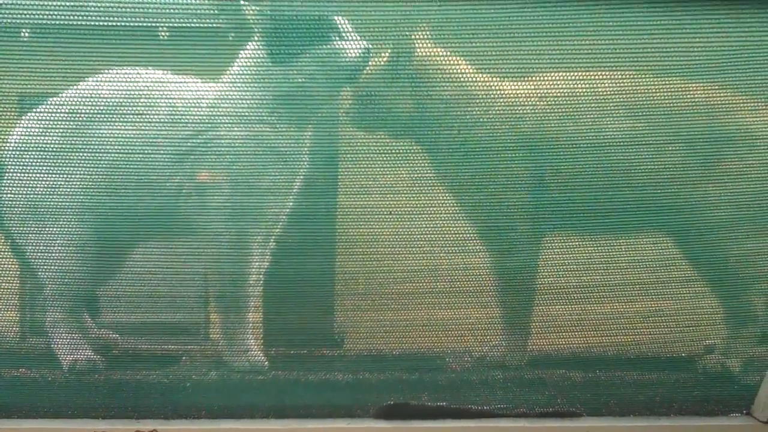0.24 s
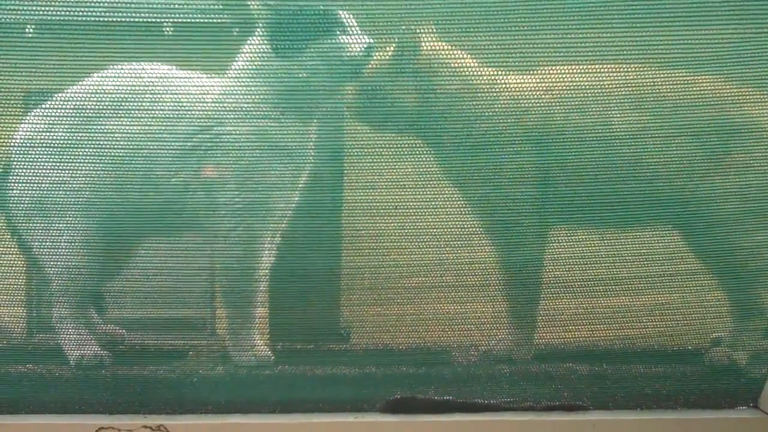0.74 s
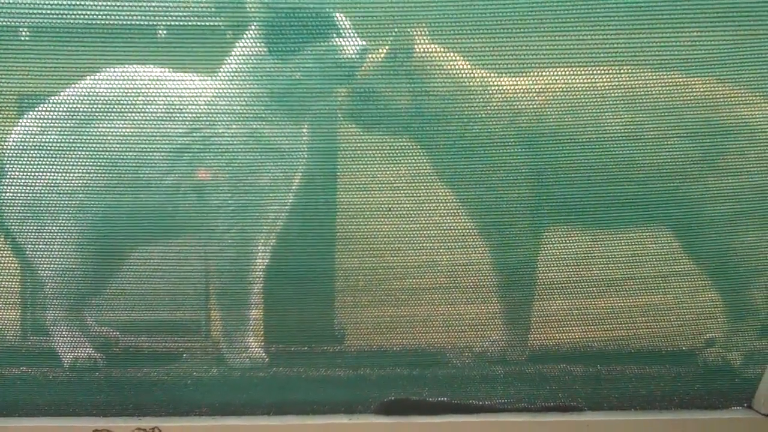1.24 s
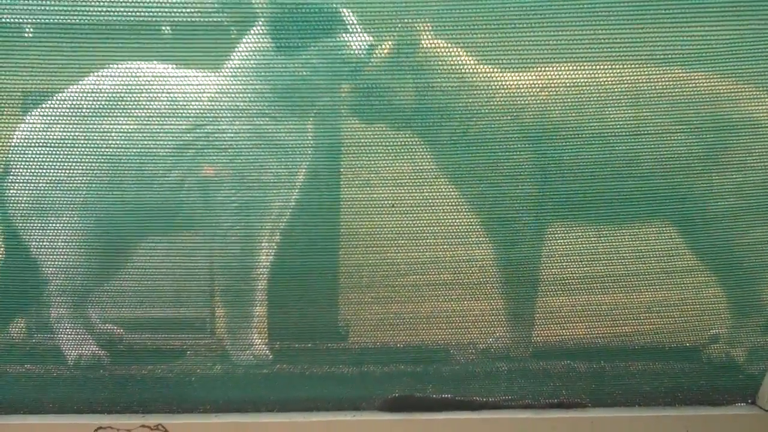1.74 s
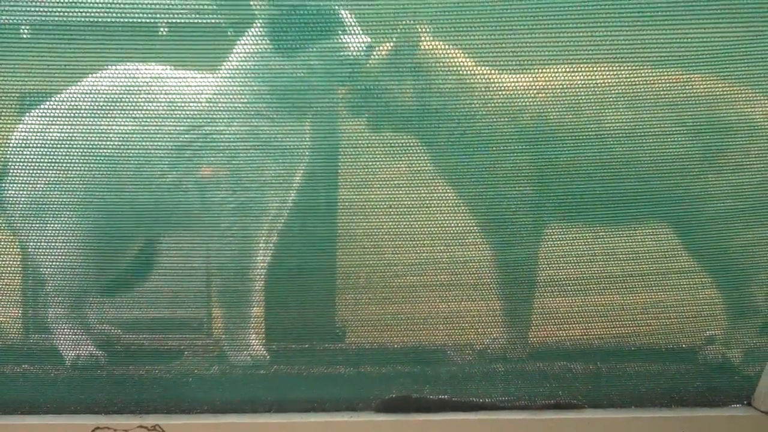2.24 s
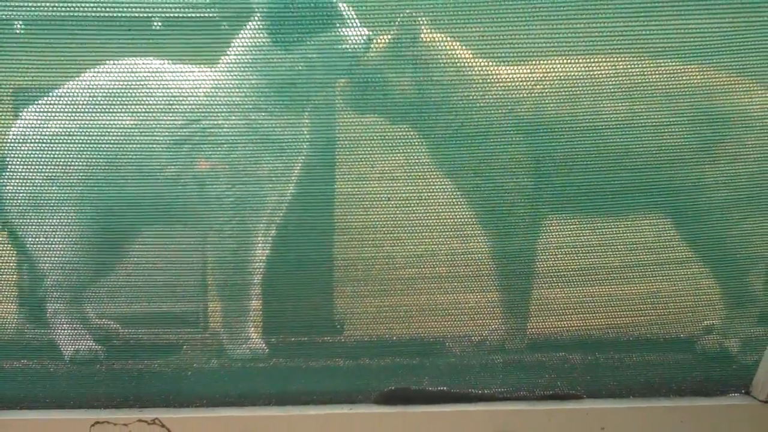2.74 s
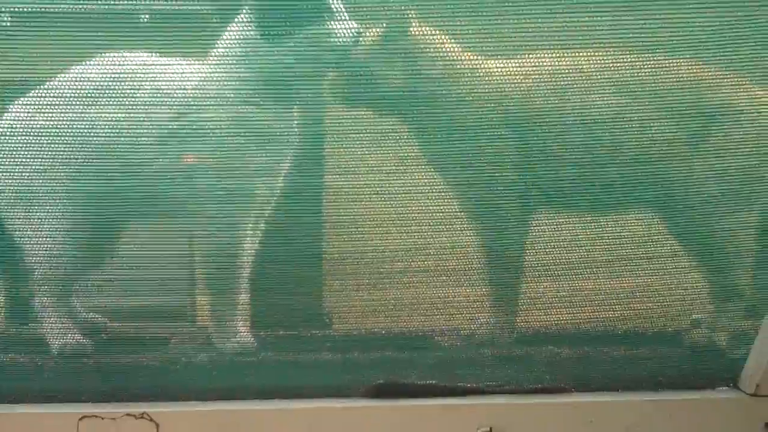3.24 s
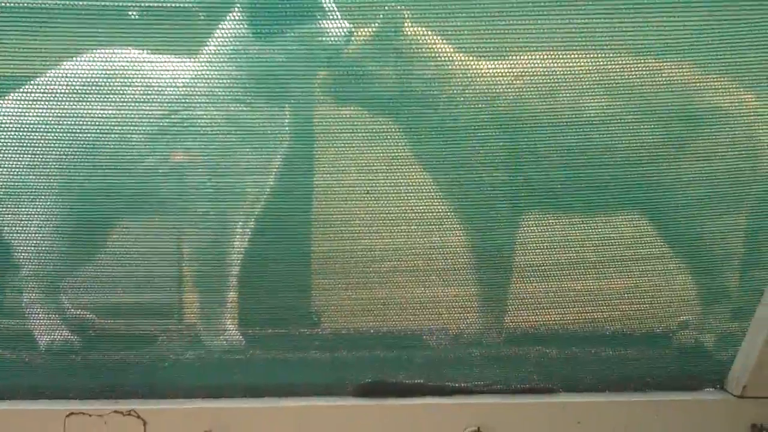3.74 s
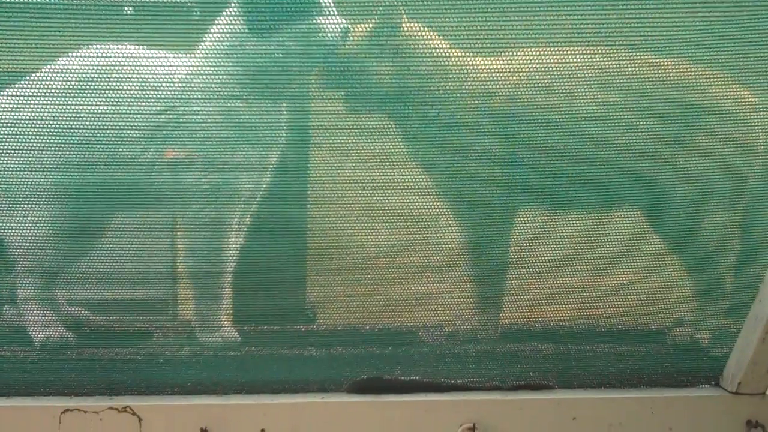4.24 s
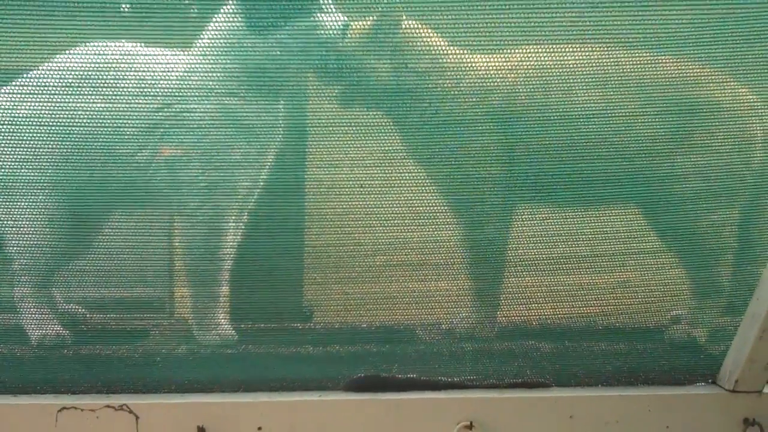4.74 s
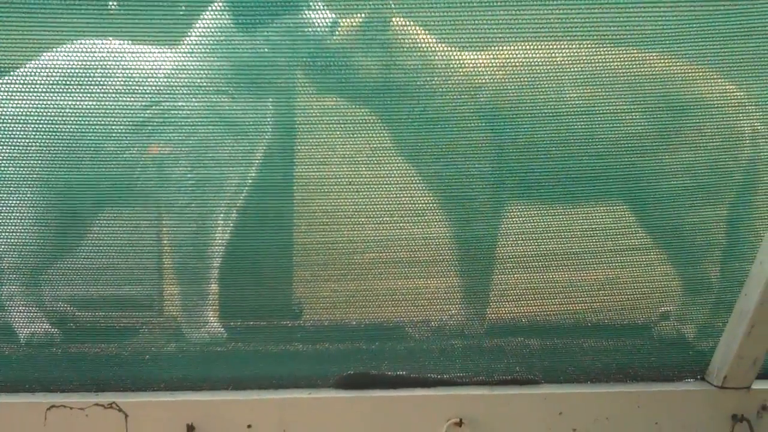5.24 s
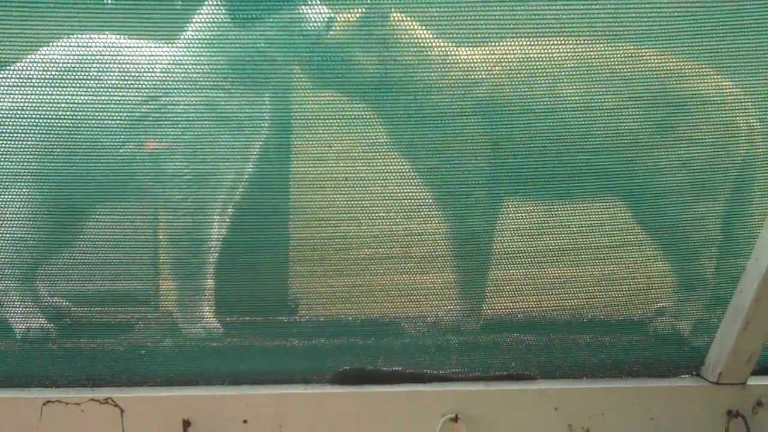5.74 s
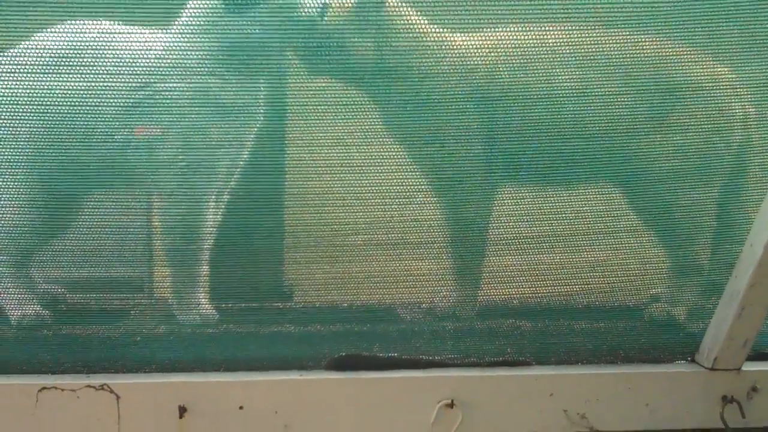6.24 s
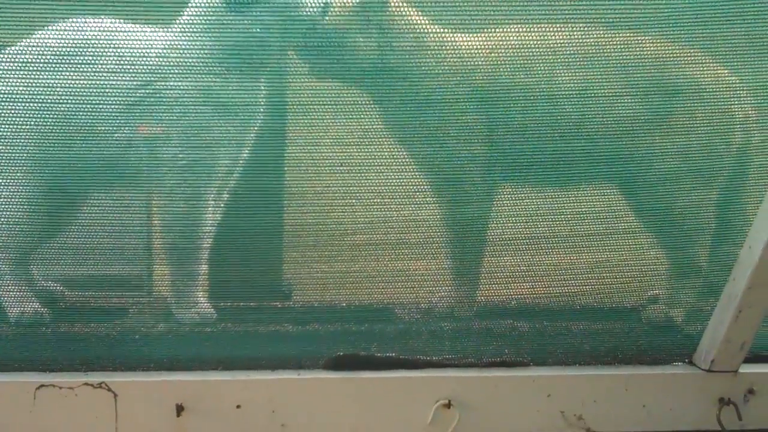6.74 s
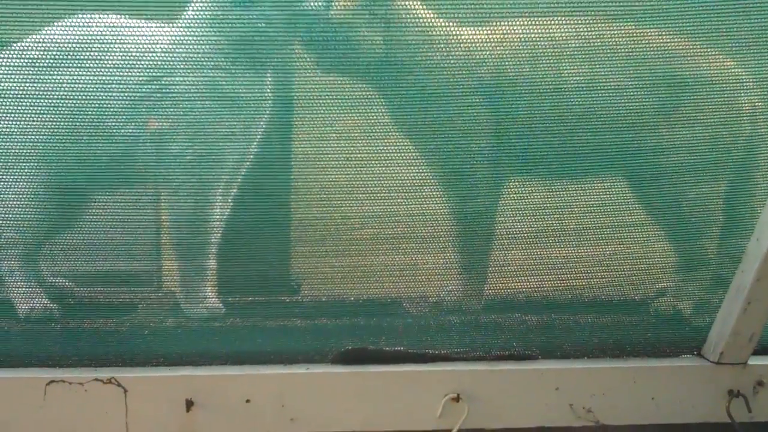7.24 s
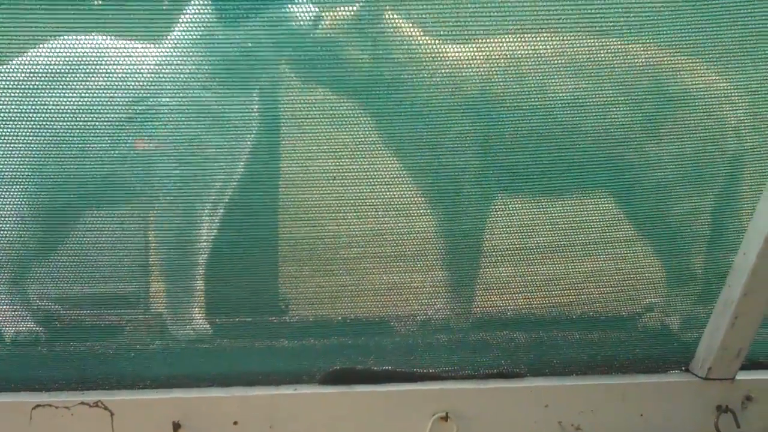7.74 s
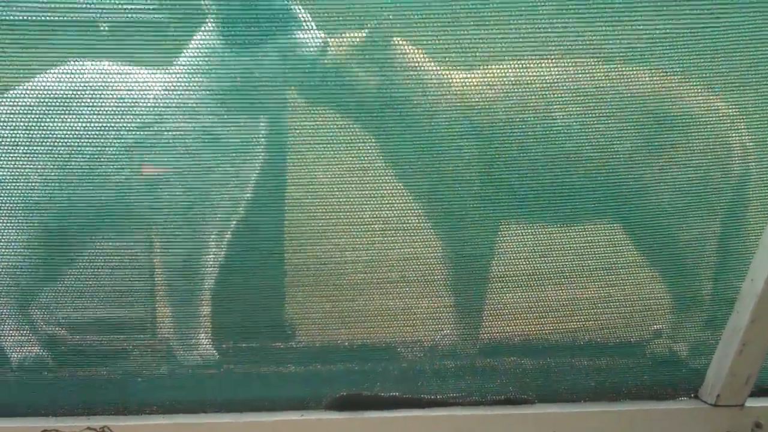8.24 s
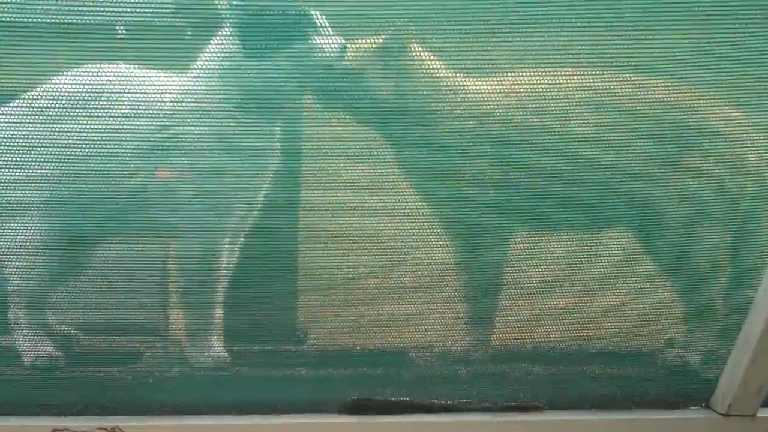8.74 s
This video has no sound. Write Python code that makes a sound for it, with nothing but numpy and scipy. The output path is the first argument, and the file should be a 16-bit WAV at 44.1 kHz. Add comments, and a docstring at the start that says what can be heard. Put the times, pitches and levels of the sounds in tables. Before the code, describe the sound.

Quiet outdoor air with far traffic, a faint high bird whistle and a tick. A cat starts yowling, then a second joins with one long wavering call lasting about six seconds, while the first answers midway. Voices overlap and beat, swell loudest near the middle, then sink and rise once more before stopping. Hush and small handling clicks follow. Handheld microphone close by, mono, slight wall reflections.

```python
"""First comes a quiet outdoor hush with far traffic, a thin bird whistle and a tick of the hand-held camera.
Then two cats on a ledge outside a screened window yowl in long, gliding, overlapping calls.
One holds a single long yowl; the other calls twice. Each voice is a stack of harmonics gliding through
mouth resonances, with rasping air at its edges. Delayed copies and a short noise tail give the nearby walls.
Clicks, rubs and knocks are bursts of coloured noise; the hush, traffic and drone are steadier noise."""
import sys
import numpy as np
from scipy import signal
from scipy.fft import rfft, irfft, next_fast_len
from scipy.io import wavfile
from scipy.ndimage import uniform_filter1d

SR = 44100
rng = np.random.default_rng(int(sys.argv[2]) if len(sys.argv) > 2 else 0)


def wav_out(sig):
    """Save sig, one row per channel (or a flat mono array), as 16-bit PCM at SR to the path in sys.argv[1]."""
    wavfile.write(sys.argv[1], SR, np.round(np.clip(np.atleast_2d(sig).T, -1, 1) * 32767).astype(np.int16))


N = 396018

# Yowl gestures: t/s, pitch f/Hz, effort level/dB before resonance, mouth opening/0-1, brightness/dB per octave
OPENING_YOWL = [(.65, 689, -106, 0.32, -9), (.72, 677, -95.5, 0.22, -3), (.76, 614, -91, .5, -10.5),
                (.9, 512, -91, 0.32, 2.5), (.95, 546, -93, 0.35, 2.5), (1.0, 549.4, -85.5, 0.62, -1),
                (1.22, 563.2, -84.5, 0.67, 0.5), (1.29, 535.4, -85, 0.55, 0), (1.34, 536, -95.5, 0.16, 5.5),
                (1.6, 498, -105, 0.04, -5.5), (1.76, 490, -90, 0.1, 3), (2.05, 513.6, -85.5, 0.53, 0.8),
                (2.28, 580.4, -79, 0.75, 3), (2.44, 588.3, -84.5, 0.75, 3), (2.58, 554, -80.5, 0.75, -1.5),
                (2.76, 491, -94.5, 0, 5.5), (2.9, 435, -101.5, 0, -8)]
LONG_YOWL = [(1.41, 311, -104.8, 0.038, -0.25), (1.53, 348.0, -92.5, 0.049, -1.1),
             (1.6, 432.6, -84, 0.093, -0.83), (1.72, 548.5, -92, 0.27, -1.6),
             (2.0, 591.2, -88.5, 0.35, -0.1), (2.17, 565, -83, 0.4, -0.051),
             (2.27, 582.6, -80.5, 0.44, -0.099), (2.52, 613.4, -77, 0.68, 0.36),
             (3.05, 596, -83.5, 0.39, 1.05), (3.45, 578.9, -82.5, 0.36, -0.25),
             (3.9, 562.9, -83, 0.36, -0.8), (4.28, 541.8, -81, 0.83, 1.45), (4.4, 520.9, -76.5, 0.68, 0.76),
             (4.55, 564.7, -74, 0.92, -0.15), (4.7, 575.2, -73.5, 0.98, -0.89), (4.92, 575.8, -81, 1, 0.0),
             (5.04, 565.2, -76.5, 0.81, 0.73), (5.17, 535, -88.5, 0.55, 1.5),
             (5.42, 468.2, -85, 0.21, 0.43), (5.67, 418.8, -86.5, 0.093, 0.3), (5.9, 402, -87, 0.2, 0.89),
             (6.02, 367.5, -87.5, 0.13, -2.6), (6.55, 378.6, -85.5, 0.14, 0.21),
             (6.72, 420.7, -82, 0.42, -0.62), (6.9, 472.4, -75.5, 0.82, -1.1),
             (7.08, 467.4, -76, 0.58, 0.14), (7.3, 501, -82, 0.71, 1.2), (7.48, 462.9, -74, 0.57, -0.4),
             (7.63, 405.5, -94.5, 0.24, -0.2), (7.71, 340.5, -107.8, 0.26, -0.21)]
ANSWERING_YOWL = [(4.16, 565.2, -112.1, 0.9, -0.1), (4.31, 619, -85.5, 0.98, 0.4),
                  (4.58, 610.3, -84.5, 0.99, 0.3), (4.85, 573.7, -79, 0.79, -0.0),
                  (5.05, 568.4, -87, 0.54, -0.1), (5.18, 589.7, -77.5, 0.6, 0.65),
                  (5.37, 580.4, -82, 0.48, 0.31), (5.6, 538.8, -87.5, 0.33, -0.2),
                  (5.87, 481.8, -96.5, 0.18, 0.019), (6.12, 455.1, -88, 0.13, -0.99),
                  (6.45, 436.5, -92.3, 0.081, -0.23), (6.68, 362.2, -100.1, 0.2, 0.024)]
# Mouth resonances of each cat: closed f/Hz, open f/Hz, half width/Hz, closed level/dB, open level/dB
LONG_FORMANTS = [(659, 1270, 247.5, 34, 34.5), (1530, 1980, 280, 1, 24.5), (2287, 2477, 136, 17.5, 37.5),
                 (3523, 4993, 175, 15.5, 4), (5470, 4700, 160, -14, -5), (6770, 8240, 350, -12.5, -7)]
OTHER_FORMANTS = [(655, 1416, 220, 41.5, 29), (1400, 1825, 230, -13.5, 38), (1988, 2315, 267, 20, 29),
                  (3510, 5280, 273, 9, 11.5), (5490, 7140, 170, -2, 1.5)]
# Throat buzz between the resonances: f/Hz, level/dB
THROAT_BUZZ = [(300, -9), (600, 4), (1000, 19.5), (1150, 21.5), (1400, 16), (1800, 15.5), (2600, 2),
               (4400, -7.5), (5500, -16.5), (7000, -13.5), (9500, -21.5), (13000, -15)]
# Brief swells of the lowest resonance, a loud "wow": t/s, half length/s, level/dB
WOW_SWELLS = [(2.052, 0.023, 12), (4.431, 0.33, 6), (5.008, 0.078, 13), (5.889, 0.094, 8.911),
              (6.613, 0.072, 2), (7.164, 0.027, 11)]
# Brief swells of the second resonance, a harsher squall: t/s, half length/s, level/dB
SQUALL_SWELLS = [(1.58, 0.056, 23.5), (6.93, 0.054, 4.5), (7.46, .04, 5.5)]
# Colour of the rasping breath: f/Hz, relative level/dB
RASP_COLOUR = [(500, -23), (1100, -6), (1750, 5), (2200, -9), (2900, -20.5), (3900, -10.5), (5200, -15.5),
               (6500, -32), (12000, -39)]
# Reflections off ledge, window frame and walls at three camera positions: delay/ms, level/dB
FIRST_ECHOES = [(2.94, -10), (5.57, -12.0), (6.57, -16.5), (7.09, -15.5), (11.67, -16), (16.08, -18.5)]
MIDDLE_ECHOES = [(1.03, -15), (2.99, -14.5), (8.63, -19), (10.76, -16.5), (12.09, -16), (13.5, -12.5)]
LAST_ECHOES = [(6.4, -16), (7.12, -14.0), (9.0, -10.5), (10.0, -12.0), (13.5, -13), (14.31, -14.5)]
# The camera shifts twice: t/s, position/0-2
CAMERA_PATH = [(3.7, 0), (4.1, 1), (5.4, 1), (5.8, 2)]
# Decay of the walls' tail: f/Hz, time to fall 60 dB/s
YARD_DECAY = [(200, 0.034), (1500, 0.63), (5000, 0.64), (12000, 0.011)]
# Camera clicks: t/s, level/dB before trim
CLICKS = [(0.5826, -60.5), (1.8267, -61), (2.934, -48), (3.6845, -59), (4.0133, -57), (4.044, -50),
          (4.4503, -52.5), (4.4867, -52), (5.7982, -54), (5.8561, -57.5), (6.0112, -58), (7.9758, -63),
          (8.3155, -47), (8.3965, -61), (8.4855, -49)]
# Fingers rubbing on the camera body: t/s, length/s, level/dB before the rub's envelope
RUBS = [(8.325, 0.0074, -67), (8.338, .034, -58.5)]
# Colour of the camera case, for clicks and rubs: f/Hz, relative level/dB
CASE_COLOUR = [(100, -13), (900, 6.5), (2000, 0), (3500, 1.5), (6500, 0), (10000, -6.5), (14000, -6)]
# Soft handling knocks: t/s, level/dB before trim
KNOCKS = [(2.933, -50), (4.043, -52.5), (5.185, -59), (8.036, -53.5)]
# Colour of the knocks: f/Hz, relative level/dB
THUD_COLOUR = [(100, -24), (500, 9.5), (900, 7.5), (2000, -11), (6000, -19.5)]
# The far bird's thin whistle: t/s, f/Hz, rms level/dB
WHISTLE = [(.3, 4180, -105), (.33, 4150, -82), (.41, 4120, -83), (.45, 4100, -105)]
# Colour of the outdoor hush: f/Hz, relative level/dB
HUSH_COLOUR = [(12, -38.5), (20, 16), (27, -3.5), (50, -9.5), (195, -13.5), (242, -14), (408, -14.5),
               (980, -11), (1160, -13), (1950, -17.5), (2290, -18.5), (3190, -21.5), (14000, -35.5)]
# Loudness of the hush before its slow waver: t/s, rms level/dB
HUSH_LEVEL = [(0, -67), (3, -67), (7.8, -66), (9, -65)]
# Colour of the far traffic: f/Hz, relative level/dB
ROAD_COLOUR = [(300, -19), (700, -8), (1000, 3.5), (1400, -23), (3000, -26.5)]
# Loudness of the traffic before its slow waver: t/s, rms level/dB
ROAD_LEVEL = [(0, -68.5), (.6, -70), (2, -81.5), (9, -88.5)]

RASP_AT_S, RASP_LASTS_S = 0.12, 0.11  # rasp peaks this far from either end of a call, about this wide
FADE_S, LOOSE_S = 0.035, 0.19  # fade at each end of a call; reach of the slack folds from each end
LOW_HZ, TOP_HZ = 22, 14000  # the low end is halved at LOW_HZ; nothing passes from TOP_HZ up


def cats():
    """The voices beat against each other where their pitches cross."""
    holder = yowl(LONG_YOWL, LONG_FORMANTS,
                  jitter=0.0011, slack=0.016, flutter_db=2.95, drift_db=0.48, rasp_db=-70)
    opening = yowl(OPENING_YOWL, OTHER_FORMANTS,
                   jitter=0.0018, slack=0.014, flutter_db=3.0, drift_db=0.04, rasp_db=-76.5)
    answer = yowl(ANSWERING_YOWL, OTHER_FORMANTS,
                  jitter=0.0027, slack=0.00392, flutter_db=3.0, drift_db=0.73, rasp_db=-79.5)
    return reflected(holder + opening + answer)


def yowl(rows, formants, jitter, slack, flutter_db, drift_db, rasp_db, count=26):
    """Vocal folds give a harmonic stack whose partials swell as they glide through the mouth's resonances."""
    start, end = round(rows[0][0] * SR), round(rows[-1][0] * SR)
    t = np.arange(start, end) / SR
    hz, effort_db, opening, tilt_db = curves(rows, t)
    peaks = swollen([resonance(row, opening) for row in formants], t)

    # the folds are slack and unsteady as a call starts and dies
    edge = np.minimum(t - t[0], t[-1] - t)
    loose = np.exp(-(edge / LOOSE_S) ** 2)
    unsteady = wobble(28, t) + 0.798 * wobble(130, t)
    hz = uniform_filter1d(hz, size=2000) * (1 + (jitter + slack * loose) * unsteady)
    # uneven cycles make the slack voice hoarse
    scatter = 8 * slack * loose * wobble(260, t)
    phase = 2 * np.pi * np.cumsum(hz) / SR + scatter

    voice = np.zeros(len(t))
    for k in range(1, count + 1):
        partial_hz = k * hz
        colour = amp(along(THROAT_BUZZ, partial_hz))
        for centre, width, gain in peaks:
            colour += gain / (1 + ((partial_hz - centre) / width) ** 2) ** 2
        bright_db = tilt_db * np.log2(partial_hz / 1000)  # tilts about 1 kHz
        shudder = 1 + 0.7 * loose * np.tanh(wobble(80, t))
        flutter = flutter_db * np.tanh(wobble(35, t))
        drift = drift_db * np.log2(k + 1) * wobble(12, t)  # wider for higher partials
        level = amp(effort_db + bright_db + flutter + drift)
        voice += np.sqrt(2) * colour * shudder * level * np.sin(k * phase)

    # slack folds leak a puff of rasping air in each cycle
    leak = np.exp(-((edge - RASP_AT_S) / RASP_LASTS_S) ** 2)
    puffs = 1 + np.cos(phase)
    rasp = amp(rasp_db + 4.5 * wobble(40, t)) * leak * puffs * noise(RASP_COLOUR)[start:end]
    fade = np.minimum(edge / FADE_S, 1)
    return np.pad((voice + rasp) * fade, (start, N - end))


def resonance(row, opening):
    """Centre, half width and gain of a mouth resonance, which shifts as the jaw drops."""
    closed_hz, open_hz, width, closed_db, open_db = row
    centre = closed_hz + opening * (open_hz - closed_hz)
    return centre, width, amp(closed_db + opening * (open_db - closed_db))


def swollen(peaks, t):
    """The two lowest resonances surge briefly into a "wow" or a squall."""
    for which, swells in enumerate([WOW_SWELLS, SQUALL_SWELLS]):
        centre, width, gain = peaks[which]
        swell_db = sum(db * np.exp(-((t - s) / half) ** 2) for s, half, db in swells)
        peaks[which] = centre, width, gain * amp(swell_db)
    return peaks


def reflected(x):
    """Close surfaces add delayed copies, so each gliding harmonic swells and dips in turn."""
    position, = curves(CAMERA_PATH, np.arange(N) / SR)
    heard = x
    for place, echoes in enumerate([FIRST_ECHOES, MIDDLE_ECHOES, LAST_ECHOES]):
        def delays(hz):
            """Each delay is a phase turn that grows with frequency."""
            return sum(amp(db) * np.exp(-2j * np.pi * hz * ms / 1000) for ms, db in echoes)
        nearness = np.maximum(1 - abs(position - place), 0)  # crossfades between positions
        heard = heard + nearness * filtered(x, delays)
    return heard


def yard(x):
    """Walls answer 8 ms later with a short noise tail that dies fastest at the top of the treble."""
    hz, t, z = signal.stft(rng.standard_normal(SR // 2), SR, nperseg=256)
    decay = amp(-60 * t / along(YARD_DECAY, hz)[:, None])
    tail = signal.istft(z * decay, SR, nperseg=256)[1]
    delayed = np.pad(x, (round(0.008 * SR), 0))
    return signal.fftconvolve(delayed, tail / np.linalg.norm(tail))[:N]


def handling():
    """The camera's case clicks, is rubbed and softly knocked: noise shaped by blows and strokes."""
    t = np.arange(N) / SR
    rubs = np.zeros(N)
    for s, length, db in RUBS:
        corners = [s, s + 0.00092, s + 0.94 * length, s + length]
        rubs += amp(db) * np.interp(t, corners, [0.025, 0.66, 0.53, 0])
    clicks = amp(-2) * bursts(CLICKS, t60=0.021)
    knocks = amp(-7) * bursts(KNOCKS, t60=0.12)
    return (clicks + rubs) * noise(CASE_COLOUR) + knocks * noise(THUD_COLOUR)


def bursts(rows, t60):
    """An envelope of sudden blows, each dying by 60 dB in t60 seconds."""
    t = np.arange(SR // 5) / SR
    envelope = np.zeros(N + SR)
    for s, db in rows:
        envelope[round(s * SR):][:len(t)] += amp(db - 60 * t / t60)
    return envelope[:N]


def bird():
    """One faint whistle from far off: a single sine sliding slightly down."""
    start, end = round(WHISTLE[0][0] * SR), round(WHISTLE[-1][0] * SR)
    hz, db = curves(WHISTLE, np.arange(start, end) / SR)
    tone = np.sqrt(2) * amp(db) * np.sin(2 * np.pi * np.cumsum(hz) / SR)
    return np.pad(tone, (start, N - end))


def outdoors():
    """Broad noise for the hush, duller noise for far traffic, a narrow band for a faint low drone."""
    t = np.arange(N) / SR
    hush = amp(curves(HUSH_LEVEL, t)[0] + 0.39 * wobble(2.3, t)) * noise(HUSH_COLOUR)
    road = amp(curves(ROAD_LEVEL, t)[0] + 0.88 * wobble(1.9, t)) * noise(ROAD_COLOUR)
    drone = amp(-82.5) * noise([(170, -45.0), (220, -10.0), (232, -2), (265, -12), (320, -46.0)])
    return hush + road + drone


def noise(spectrum):
    """Coloured noise of rms 1."""
    return unit(filtered(rng.standard_normal(N), lambda hz: amp(along(spectrum, hz))))


def filtered(x, response):
    """x shaped by a response of frequency."""
    m = next_fast_len(N + SR // 2)
    return irfft(rfft(x, m) * response(np.fft.rfftfreq(m, 1 / SR)), m)[:N]


def wobble(rate, t):
    """A smooth random curve with rate knots a second."""
    knots = rng.standard_normal(8192)
    smooth = signal.resample_poly(knots, 8, 1)
    places = np.arange(len(smooth)) * len(knots) / len(smooth)
    return np.interp(t * rate, places, smooth)


def curves(rows, t):
    """Each column after the time, read at the times t."""
    s, *cols = np.transpose(rows)
    return [np.interp(t, s, c) for c in cols]


def along(points, hz):
    """(f/Hz, value) points read on a log frequency axis."""
    f, v = np.transpose(points)
    return np.interp(np.log(hz + 1), np.log(f + 1), v)


def unit(x):
    """x at rms 1."""
    return x / np.sqrt(np.mean(x ** 2) + 1e-20)


def amp(db):
    """Decibels to gain."""
    return 10 ** (np.asarray(db) / 20)


def scene():
    """Cats with their echo, the background and the camera, in one channel."""
    voices = cats()
    echo = amp(-14) * yard(voices)
    return (voices + echo + outdoors() + bird() + handling())[None]


def record(dry):
    """The camera keeps neither the deepest rumble nor anything above its band limit."""
    def band(hz):
        """A gentle low cut and a sharp top."""
        return (hz < TOP_HZ) * hz ** 4 / (hz ** 4 + LOW_HZ ** 4)
    return np.array([filtered(channel, band) for channel in dry])


dry = scene()
out = record(dry)
wav_out(out)
```